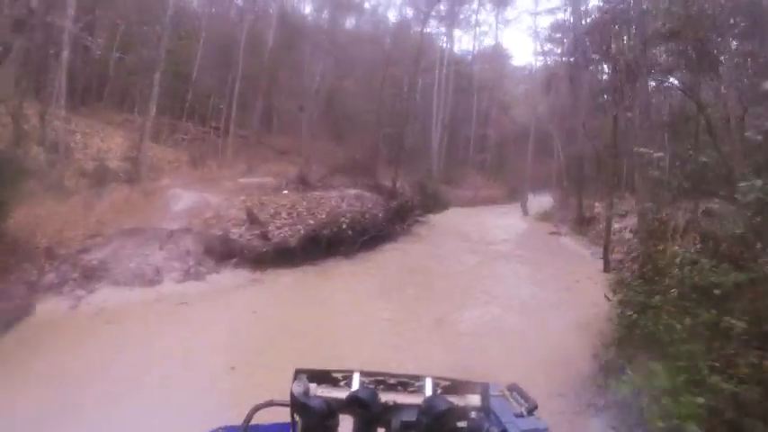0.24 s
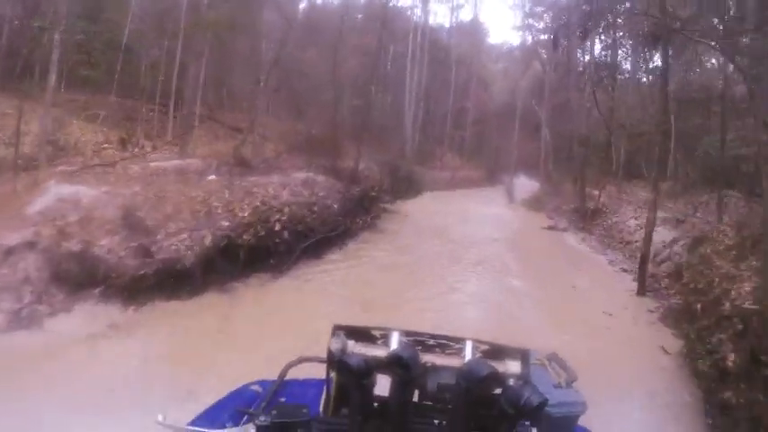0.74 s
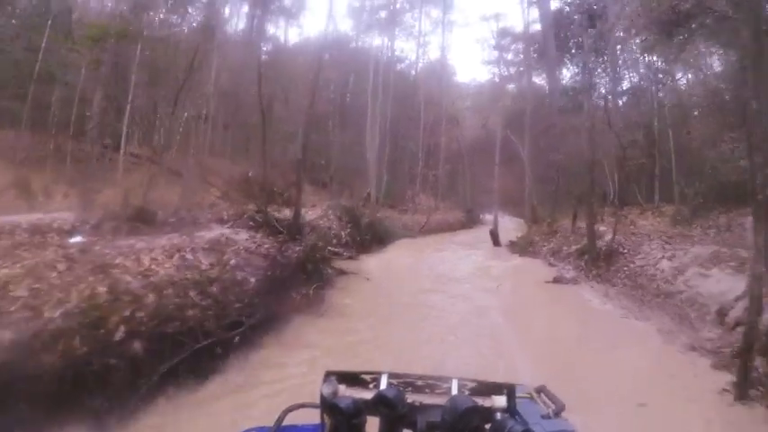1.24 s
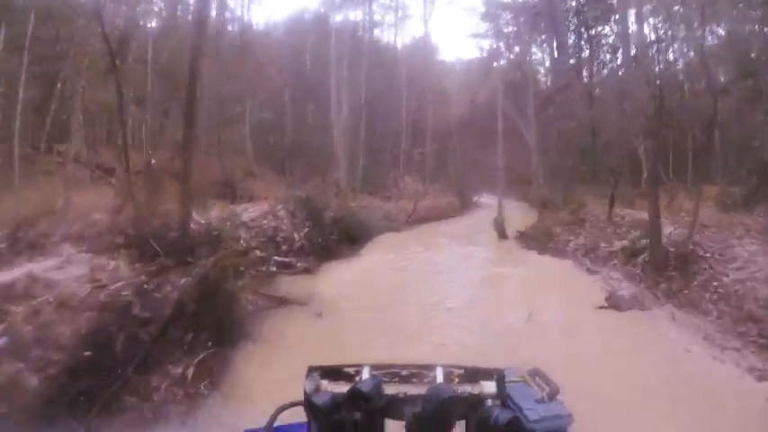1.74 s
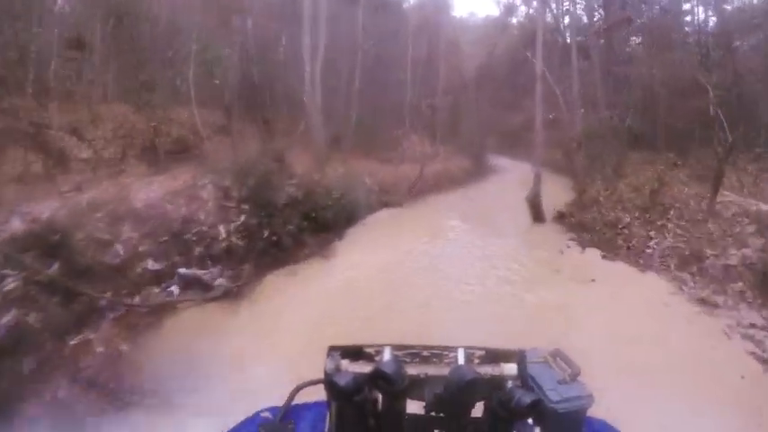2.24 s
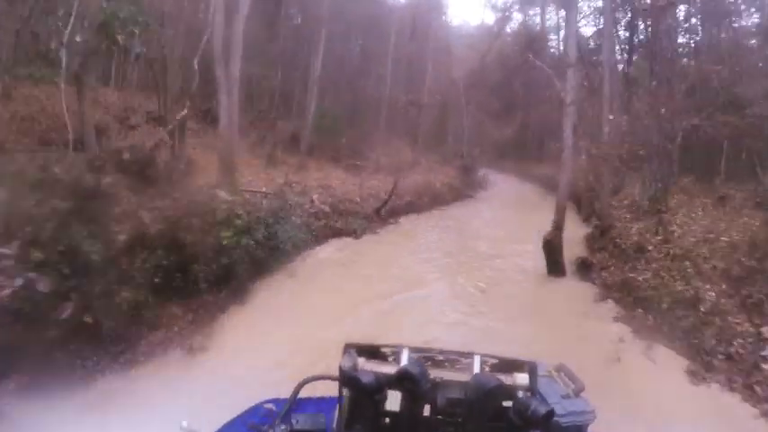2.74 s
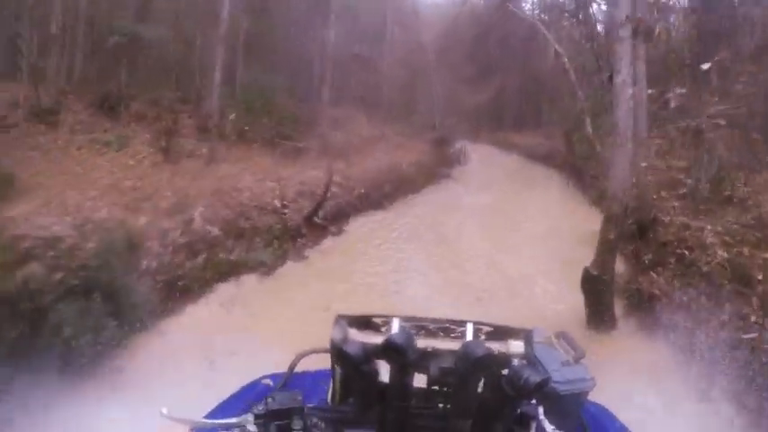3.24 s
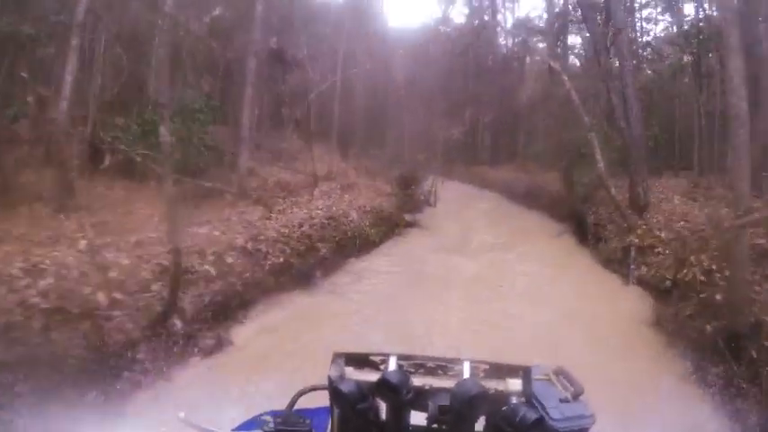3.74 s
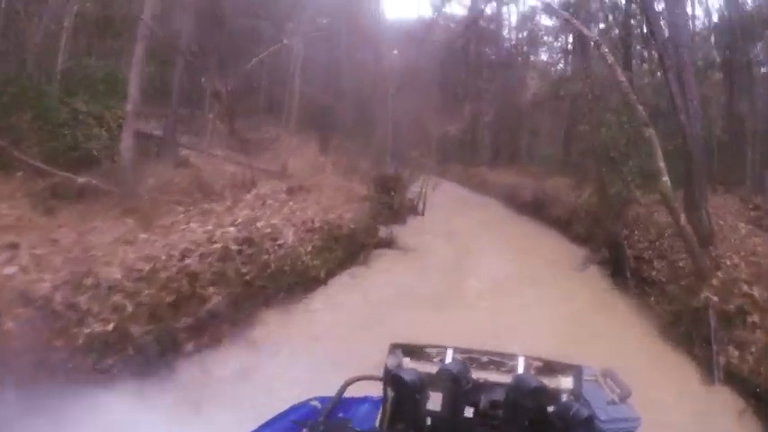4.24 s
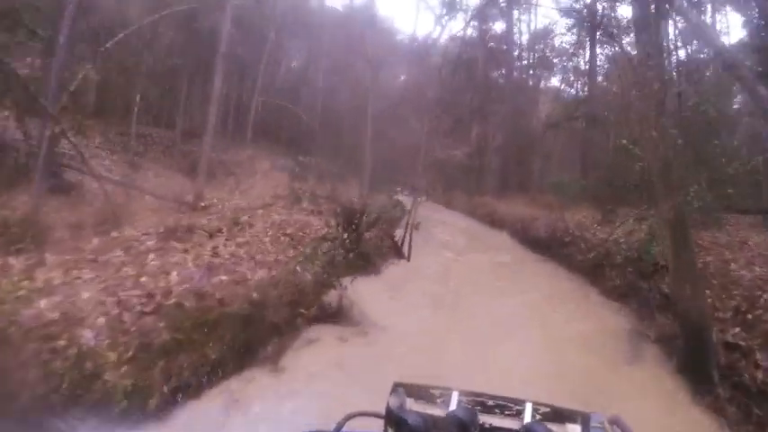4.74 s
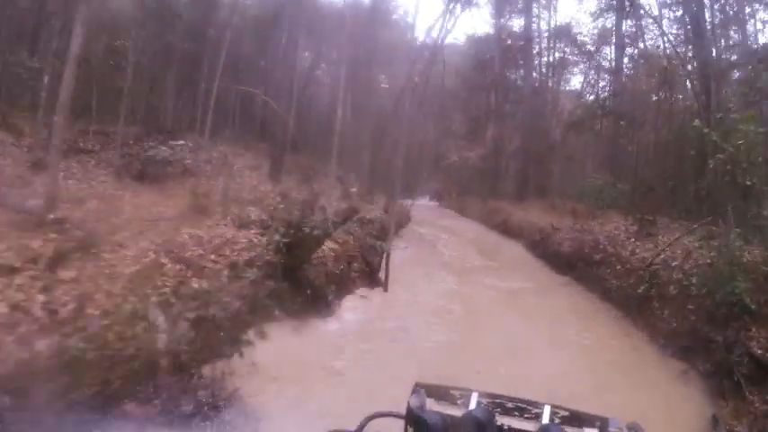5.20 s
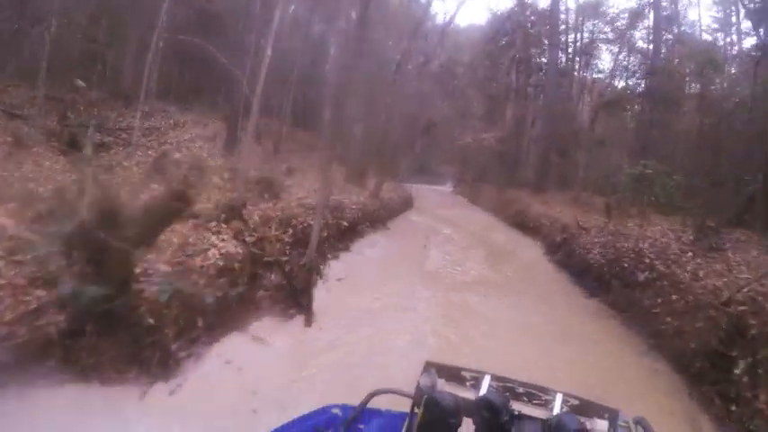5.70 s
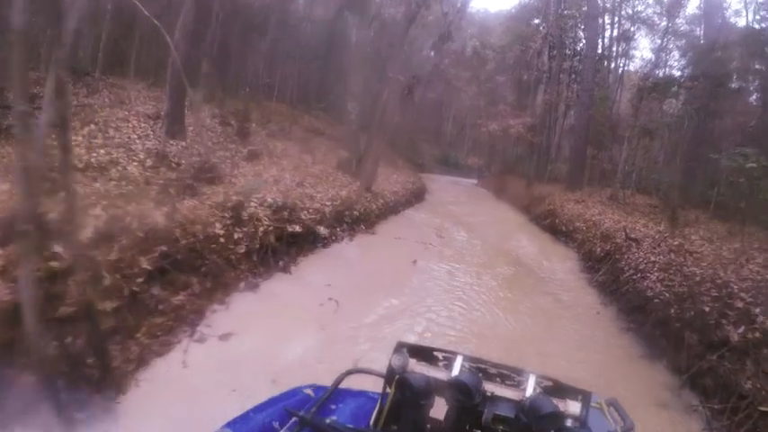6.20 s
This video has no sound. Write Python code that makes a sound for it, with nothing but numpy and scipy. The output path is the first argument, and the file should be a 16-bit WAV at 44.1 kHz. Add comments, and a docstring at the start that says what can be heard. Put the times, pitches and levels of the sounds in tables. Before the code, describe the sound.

The sound begins with a small all-terrain vehicle already running, wading slowly along a shallow creek in woods. Close to the rider, a strong low hum sits under soft exhaust pulses, about 38 each second, blurred into a fluttering purr with low gurgle and loose mechanical clatter. From about 0.6 s the throttle rolls on; pitch climbs smoothly by roughly a third, peaking around 1.45 s as a hoarse intake growl jumps forward and the roar brightens. It is released near 1.5 s and sinks by 2.2 s, with a barely noticeable tiny skip near 2.05 s. The even chug then continues, lifting very slightly around 4 to 4.5 s, and holds steady until the cut near 6.4 s. Water adds just a faint, flickering hiss, shaken by the engine. Everything is near, dry, bass-heavy and dulled, as if inside a sealed casing, with the loudest peaks slightly rounded.

```python
"""At a shallow creek, a small four-wheeler wades along and gives one short rev, heard by its rider.
Each firing sends a soft pulse ringing through the exhaust, and the crank hums through the frame.
Noise and clatter throb with the firings; as the engine speeds up, the intake growl jumps out.
Water hisses along the hull: shaped noise, dulled as if heard from inside a sealed housing."""
import sys
import numpy as np
from scipy import signal
from scipy.fft import rfft, irfft, next_fast_len
from scipy.io import wavfile
from scipy.ndimage import uniform_filter1d, map_coordinates

SR = 44100
rng = np.random.default_rng(int(sys.argv[2]) if len(sys.argv) > 2 else 0)


def master_out(mix):
    """Clip the mix to full scale and print it as 16-bit PCM to the path in sys.argv[1]."""
    frames = np.transpose(np.atleast_2d(mix))
    ceiling = np.clip(frames, -1, 1)
    pcm = np.round(ceiling * 32767).astype(np.int16)
    wavfile.write(sys.argv[1], SR, pcm)


N = 284886  # length in samples
CRUISE_HZ = 38  # firings per second while wading

# The ringing tones of the exhaust pipe.
# Each row: pitch in Hz, width in Hz, level in dB against the others, extra gain (minus flips the wave).
EXHAUST_MODES = [(123, 12.1, -9.5, -1.51), (238, 141, 0, -0.9), (334.2, 79.8, 1.5, 0.93)]
# Three single ringing tones: pitch in Hz, width in Hz.
RASP, BUZZ, DRONE = (491.6, 124), (688.4, 107), (181, 17.1)
# Their loudness: level at cruise in dB, gain in dB per octave of engine speed.
RASP_LEVEL, BUZZ_LEVEL, DRONE_LEVEL = (-29.5, 14), (-45, -9), (-22, -14.5)
WANDER_DB = 1.3  # typical slow drift of each single tone
BARK_DB, BARK_YIELDS = -15, 0.49  # level at average hum; dB lost per dB of extra hum
BARK_THROTTLE_DB = 0  # gain per unit of throttle


def exhaust(cycle, rate, hum_db, gas):
    """One soft pulse a firing rings every tone of the pipe."""
    # the valve opens 2.3 ms before the pressure peak
    opening = cycle + .0023 * rate
    fired = np.flatnonzero(np.diff(np.floor(opening)) > 0)

    # no two firings are quite alike in timing or strength
    scatter = rng.standard_normal((len(fired), 2))
    late_samples = np.round(.00003 * SR * scatter[:, 0]).astype(int)
    pulses = np.zeros(N)
    pulses[np.clip(fired + late_samples, 0, N - 1)] = amp(0.27 * scatter[:, 1]) / rate[fired]
    # the muffler rounds the front of the pulse
    pulses = filtered(pulses, lambda f: 1 / (1 + (f / 750) ** 6))

    revs = np.log2(rate / CRUISE_HZ)  # octaves above cruising speed
    bark = np.zeros(N)
    for hz, width_hz, db, sign in EXHAUST_MODES:
        ring = filtered(pulses, lambda f: mode(f, hz, width_hz))
        # high revs favour the upper tones
        ring_db = db + 0.8 * wobble(2.482) + 2.3 * revs * np.log2(hz / 280)
        bark += sign * amp(ring_db) * ring
    bark_db = BARK_DB - BARK_YIELDS * (hum_db - hum_db.mean()) + BARK_THROTTLE_DB * gas

    rasp_db, buzz_db, drone_db = (db + speed_db * revs + WANDER_DB * wobble(3.504)
                                  for db, speed_db in (RASP_LEVEL, BUZZ_LEVEL, DRONE_LEVEL))
    # rasp and buzz pass a chamber of the same pitch (hence the square), so they build up gently
    rasp = amp(rasp_db) * unit(filtered(pulses, lambda f: mode(f, *RASP) ** 2))
    buzz = amp(buzz_db) * unit(filtered(pulses, lambda f: mode(f, *BUZZ) ** 2))
    drone = amp(drone_db) * unit(filtered(pulses, lambda f: mode(f, *DRONE)))
    return amp(bark_db) * unit(bark) + rasp - buzz + drone


# How hard the crank shakes the frame over time.
# Each row: time in seconds, hum in dB, thump in dB (both before a shared 2.5 dB lift).
CRANK_LEVELS = [(0.06, -15.5, -43), (0.29, -15, -33), (1.06, -18, -27), (1.44, -15, -21),
                (2.02, -16.5, -32), (2.11, -15.5, -44), (2.23, -17, -37.5), (2.89, -14, -37.5),
                (3.04, -15, -44), (3.13, -16.5, -38), (4.51, -17, -34), (4.61, -15.5, -41.5),
                (5.59, -17, -32), (5.69, -16.5, -42), (5.97, -16, -36), (6.4, -16.5, -36)]


def crank_levels():
    """The crank's hum and its once-a-firing thump rise and fall over time, in dB."""
    return curves(CRANK_LEVELS)


def crank(cycle, rate, hum_db, thump_db):
    """Two crank turns a firing hum through the frame, 5.5 ms late; a thump marks each firing."""
    late = cycle - .0055 * rate
    hum = amp(hum_db) * np.cos(2 * np.pi * (2 * late + .63))
    thump = amp(thump_db) * np.cos(2 * np.pi * (late - .145))
    return amp(2.5) * (hum + thump)


# Colour of the open intake. Each row: frequency in Hz, level in dB per Hz.
GROWL_COLOUR = [(500, -26.5), (800, 0), (1150, 3), (1550, -7), (2000, -16), (3000, -41)]


def intake(cycle, rate):
    """The intake gulps air once a crank turn; its growl grows steeply with engine speed."""
    revs = np.log2(rate / 49)  # octaves above 49 firings per second
    gulps = throb(2 * cycle, 3.3, at=0.13) * throb(cycle, 1.4, at=0.3) * amp(4.3 * wobble(90))
    air = rush(GROWL_COLOUR, patchy_db=1.5) + amp(4.0) * clatter(cycle, GROWL_COLOUR, renew=3.5)
    return amp(-40.5 + 62 * revs) * gulps * air


# Body panels that colour the roar. Each row: pitch in Hz, width in Hz, lift in dB.
BODY_PANELS = [(696, 140, -0.5), (915, 22, 4), (1101, 32, 3.5), (1602, 78, 3.5), (2460, 300, 3),
               (3560, 980, 5.5)]
# Colour of the roar before the panels. Each row: frequency in Hz, level in dB per Hz.
ROAR_COLOUR = [(350, -14.5), (600, 0.5), (1000, -2.5), (1600, -11), (2500, -19), (3000, -26.5), (4500, -32),
               (7000, -57)]
# Colour of the low gurgle. Each row: frequency in Hz, level in dB per Hz.
GURGLE_COLOUR = [(15, -49.5), (30, -18.5), (100, -7), (190, 0.5), (300, -3.5), (480, -5), (700, -16.5),
                 (1000, -50)]
ROAR_DB, ROAR_THROTTLE_DB = -37.5, 8.5  # level at cruise; gain per unit of throttle
RASPING_DB = 1.5  # extra depth of the roar's throb per unit of throttle


def roar(cycle, roar_db, gas):
    """Gas noise and clatter swell after each firing through the panels; gurgle and gear whine join in."""
    def panels(f):
        return 1 + sum((amp(db) - 1) * mode(f, hz, width_hz) for hz, width_hz, db in BODY_PANELS)

    mix = rush(ROAR_COLOUR, patchy_db=1.5) + amp(-2.5) * clatter(cycle, ROAR_COLOUR, renew=2.4)
    puffs = unit(filtered(throb(cycle, 1.1 + RASPING_DB * gas, at=0.14) * mix, panels))

    knocking = amp(2.5) * clatter(cycle, GURGLE_COLOUR, renew=1.8)
    gurgle = throb(cycle, 1.0, at=0.23) * (rush(GURGLE_COLOUR, patchy_db=1.9) + knocking)

    teeth = 40  # gear teeth passing per firing
    whine_db = -17.5 - 9 * gas + 3.6 * wobble(2.2)  # against the roar
    whine = amp(whine_db) * np.sin(2 * np.pi * teeth * cycle)
    # the gurgle follows only a tenth of the roar's changes in dB
    return amp(roar_db) * (puffs + whine) + amp(0.1 * roar_db - 25) * gurgle


def clatter(cycle, spectrum, renew, size=512):
    """Valves, chain and gears repeat a random pattern each cycle, renewed `renew` times a second."""
    patterns = rng.standard_normal((40, size))
    where = [np.arange(N) * renew / SR, cycle * size]
    return tint(map_coordinates(patterns, where, mode="grid-wrap"), spectrum)


# Colour of the water's hiss. Each row: frequency in Hz, level in dB per Hz.
WATER_COLOUR = [(3000, -17), (4800, -6.5), (6100, 0.5), (7500, -6.5), (9500, -14), (11000, -26),
                (12800, -15.5), (16000, -23)]
HISS_DB, HISS_THROTTLE_DB = -58, 7.5  # level at cruise; gain per unit of throttle
HISS_SWELLS = 1.1  # dB of hiss per dB of swell


def water(cycle, hiss_db):
    """Spray along the hull is noise, flickering fast and shaken by the engine."""
    flicker = unit(amp(1.2 * wobble(120)))
    return amp(hiss_db) * flicker * throb(cycle, 0.72, at=0.26) * rush(WATER_COLOUR, patchy_db=1.0)


# Slow swell shared by roar and hiss. Each row: time in seconds, change from the cruise level in dB.
SLOW_SWELL = [(0, 3), (.3, -0.5), (1.0, 1), (1.9, -2.5), (2.3, -1), (2.5, -0.5), (3.04, 1), (3.64, 0),
              (3.9, 1), (4.5, 0), (5.0, -0.5), (5.5, -0.5), (6.46, -1)]


def swell():
    """Roar and hiss rise and fall slowly together, in dB."""
    return curves(SLOW_SWELL)[0]


# Speed of the engine. Each row: time in seconds, firings per second.
ENGINE_SPEED = [(0, 36.54), (0.13, 35.35), (0.4, 36.12), (0.75, 38.97), (1.0, 42.58), (1.3, 48.53),
                (1.45, 50.02), (1.6, 48.66), (1.77, 45.38), (1.9, 41.49), (2.03, 39.58), (2.05, 39.01),
                (2.25, 37.44), (2.85, 37.59), (3.5, 37.66), (3.95, 39.63), (4.33, 38.99), (4.52, 39.54),
                (4.87, 37.26), (5.2, 37.67), (5.55, 37.82), (5.72, 37.59), (6.3, 38.2), (6.46, 37.74)]


def engine_speed():
    """Firings per second rise for the rev and settle back, setting the pitch of the engine."""
    return curves(ENGINE_SPEED)[0]


# A brief skip in the sound: its middle in seconds, share of a firing the count falls behind, half-length in #
# seconds.
SKIP_S, SKIP_LAG, SKIP_LENGTH_S = 2.045, .03, .006
SKIP_DB = -12  # brief dip of the crank hum at its middle


def skip():
    """A brief bump from 0 to 1 and back marks where the firing count skips back and the hum dips."""
    return np.exp(-((np.arange(N) / SR - SKIP_S) / SKIP_LENGTH_S) ** 2)


# The throttle starts to open, is widest, is let go, has shut: times in seconds.
OPEN_S, FULL_S, LET_GO_S, SHUT_S = 0.63, 1.38, 1.51, 1.66


def throttle():
    """The opening from 0 to 1: a slow roll on, a short easing back, a quick release."""
    return np.interp(np.arange(N) / SR, [OPEN_S, FULL_S, LET_GO_S, SHUT_S], [0, 0.99, .8, 0])


def amp(db):
    """Decibels as a plain gain."""
    return 10 ** (np.asarray(db) / 20)


def unit(x):
    """x scaled to an average (rms) level of 1."""
    return x / np.sqrt(np.mean(x ** 2) + 1e-20)


def curves(rows):
    """One value per sample for each column after the time."""
    s, *cols = np.transpose(rows)
    return [np.interp(np.arange(N) / SR, s, c) for c in cols]


def wobble(rate):
    """A smooth random curve through `rate` random points a second."""
    return map_coordinates(rng.standard_normal(int(N * rate / SR) + 4), [np.arange(N) * rate / SR])


def filtered(x, response):
    """x passed through a filter given as a complex response of frequency."""
    m = next_fast_len(N + SR // 2)  # spare room lets the ringing die away
    return irfft(rfft(x, m) * response(np.fft.rfftfreq(m, 1 / SR)), m)[:N]


def mode(f, hz, width_hz):
    """One ringing tone as a filter, with gain 1 at its centre."""
    return 1j * f * width_hz / (hz * hz - f * f + 1j * f * width_hz)


def tint(x, spectrum):
    """x coloured by points of Hz and dB, at rms 1."""
    hz, db = np.transpose(spectrum)
    return unit(filtered(x, lambda f: amp(np.interp(np.log(f + 1), np.log(hz), db, -120, -120))))


def rush(spectrum, patchy_db):
    """Coloured noise of rms 1, with patches of random gain in time and frequency."""
    z = signal.stft(rng.standard_normal(N), nperseg=512)[2]
    field = uniform_filter1d(rng.standard_normal(z.shape), 5, 0)
    field = uniform_filter1d(field, 14, 1)
    patchy = signal.istft(z * amp(patchy_db * unit(field)), nperseg=512)[1][:N]
    return tint(patchy, spectrum)


def throb(cycle, depth_db, at):
    """A gain that peaks once a cycle, at the share `at` of it."""
    return unit(amp(depth_db * np.cos(2 * np.pi * (cycle - at))))


def scene():
    """Engine speed and throttle drive every layer; the layers simply add."""
    rate = engine_speed()
    hum_db, thump_db = crank_levels()
    swell_db = swell()
    gas = throttle()
    skip_bump = skip()
    roar_db = ROAR_DB + ROAR_THROTTLE_DB * gas + swell_db + .5 * wobble(3.4)
    hiss_db = HISS_DB + HISS_THROTTLE_DB * gas + HISS_SWELLS * swell_db

    # firings so far; at the skip the count falls back by a small share of a firing, so later firings come #
    # late
    cycle = np.cumsum(rate / SR - SKIP_LAG * skip_bump / skip_bump.sum())
    engine = exhaust(cycle, rate, hum_db, gas)
    engine += crank(cycle, rate, hum_db + SKIP_DB * skip_bump, thump_db)
    engine += intake(cycle, rate)
    engine += roar(cycle, roar_db, gas)
    return (engine + water(cycle, hiss_db))[None]


TOP_HZ = 15290  # band limit


def record(dry):
    """The input stage rounds off the highest peaks; nothing above the band limit is kept."""
    rounded = dry[0] / (1 + np.abs(dry[0] / .68) ** 5) ** (1 / 5)
    return filtered(rounded, lambda hz: hz < TOP_HZ)[None]


dry = scene()
out = record(dry)
master_out(out)
```